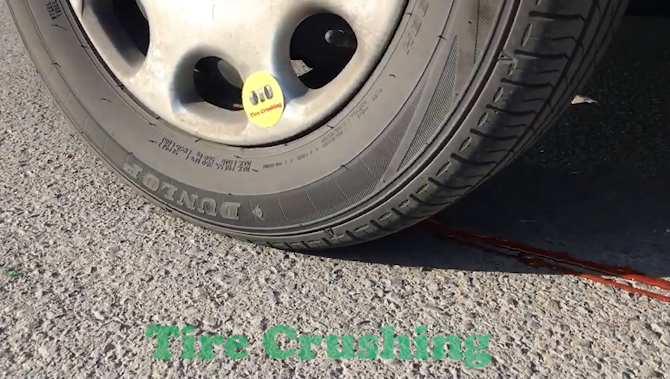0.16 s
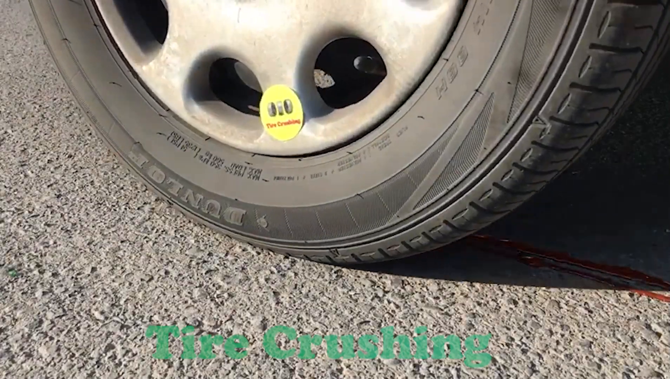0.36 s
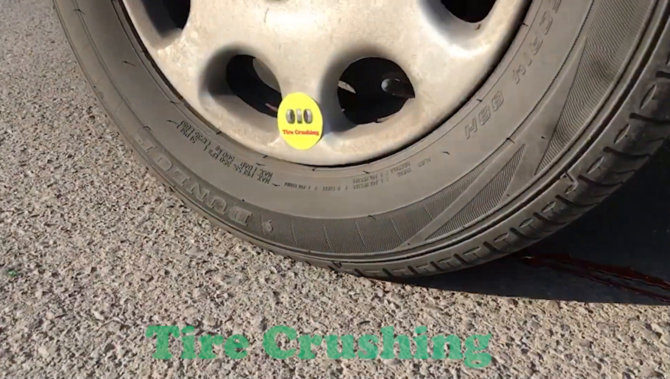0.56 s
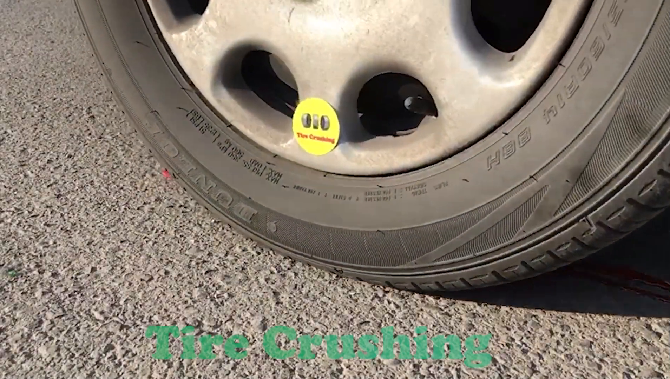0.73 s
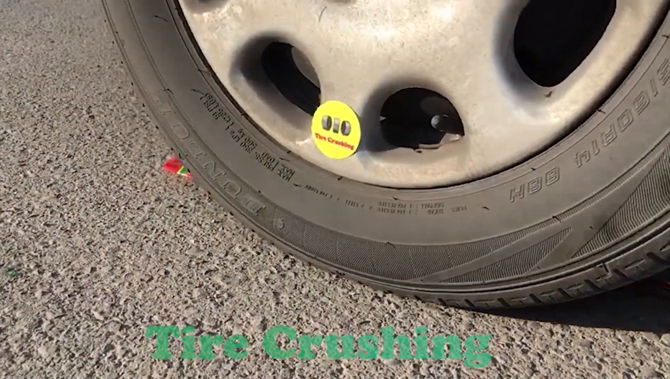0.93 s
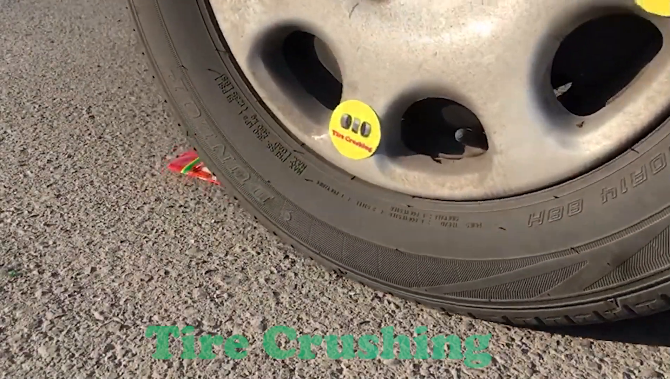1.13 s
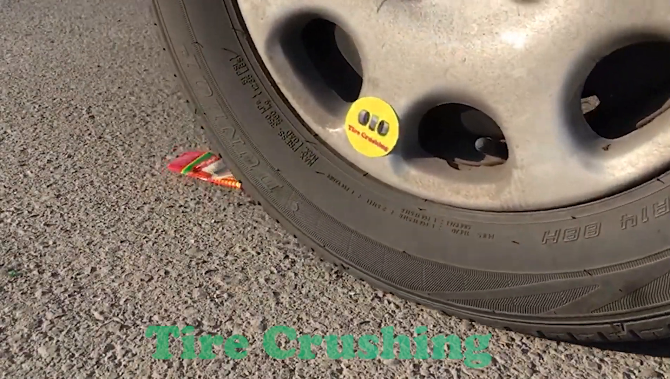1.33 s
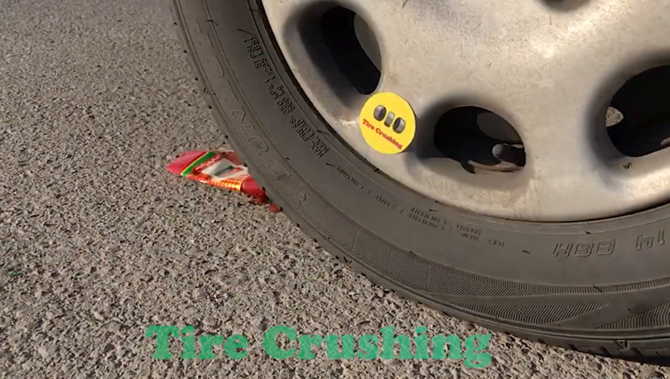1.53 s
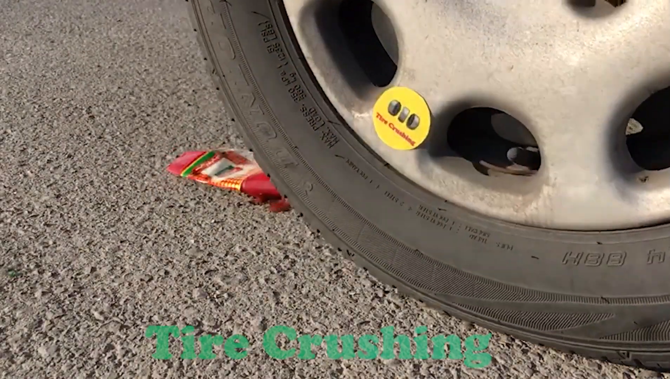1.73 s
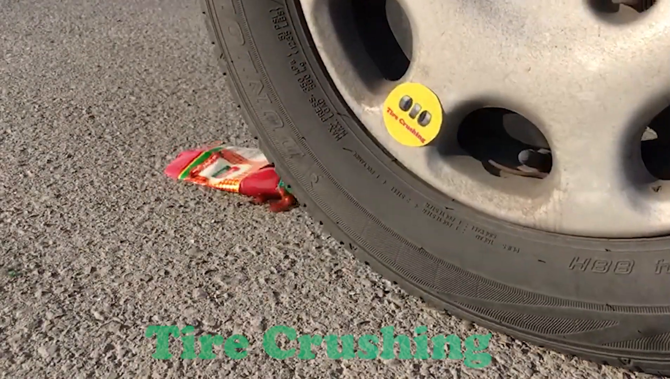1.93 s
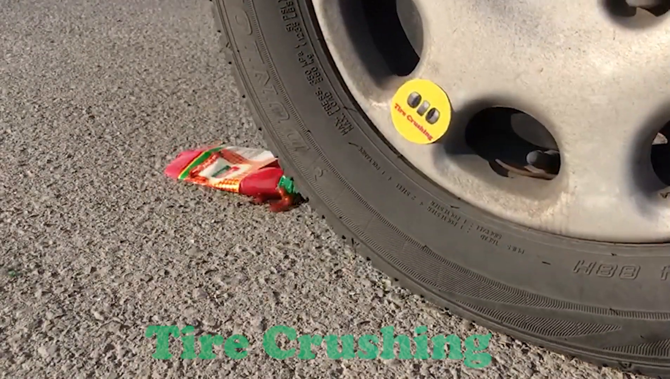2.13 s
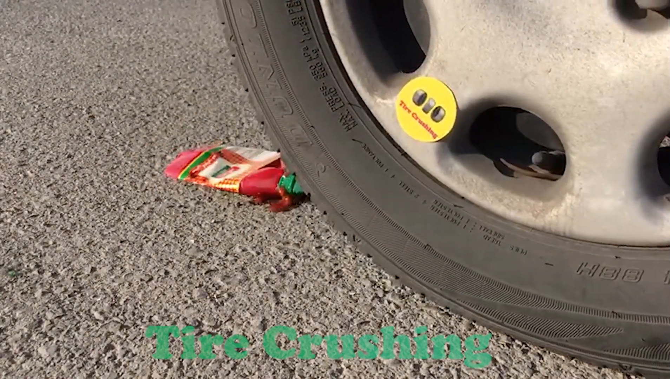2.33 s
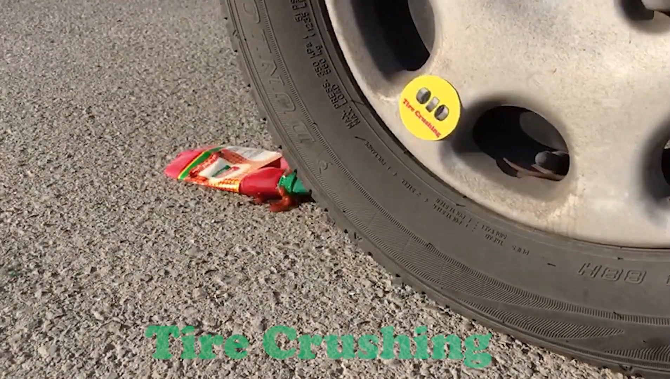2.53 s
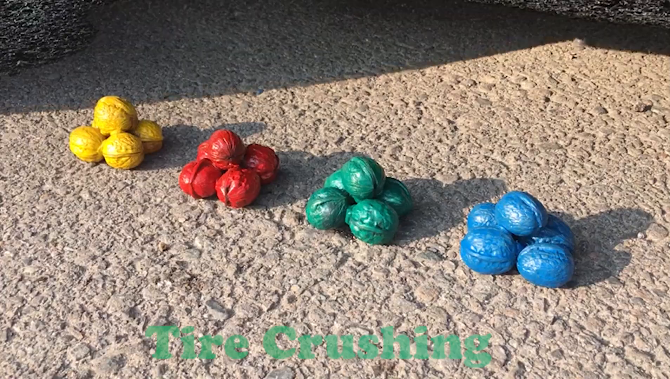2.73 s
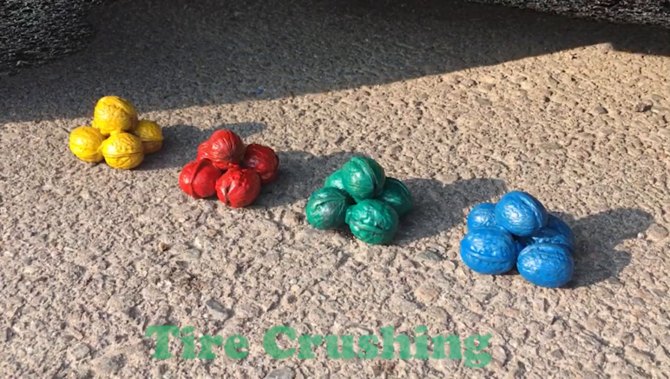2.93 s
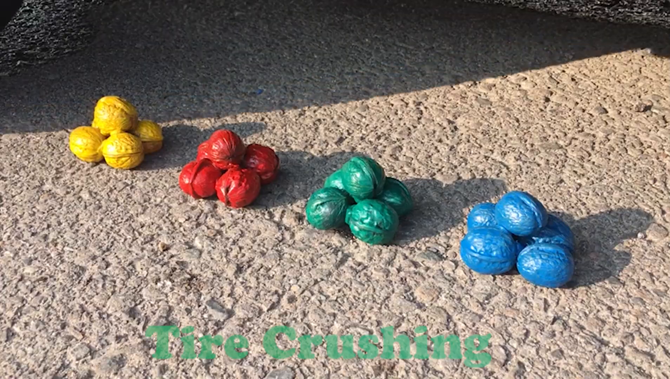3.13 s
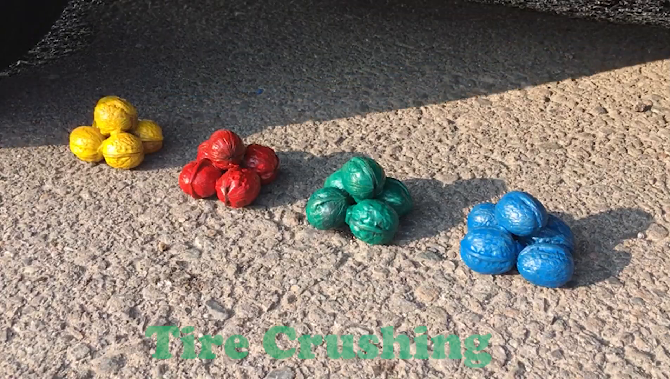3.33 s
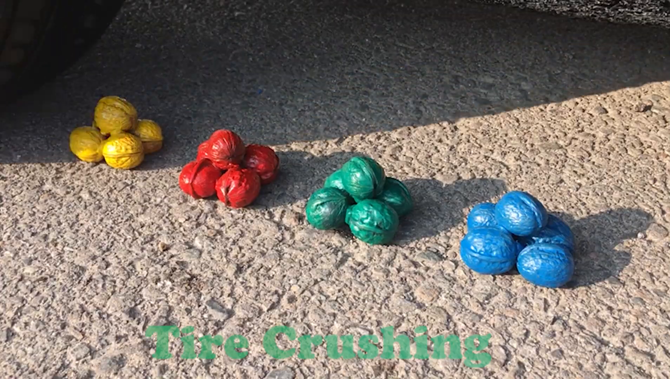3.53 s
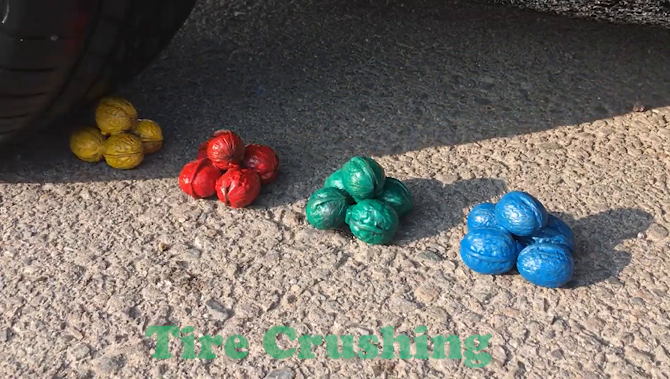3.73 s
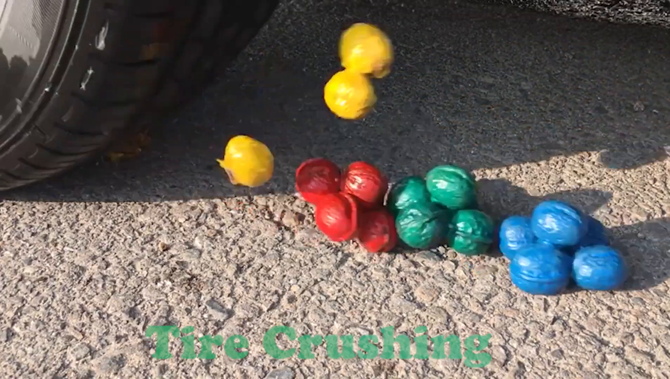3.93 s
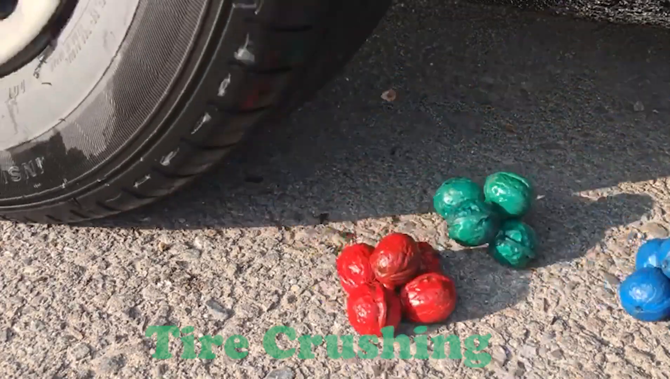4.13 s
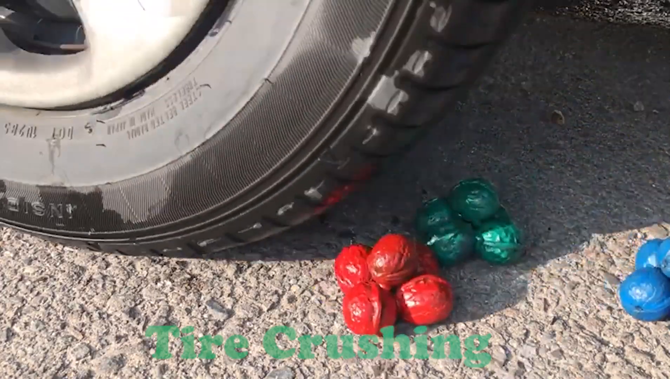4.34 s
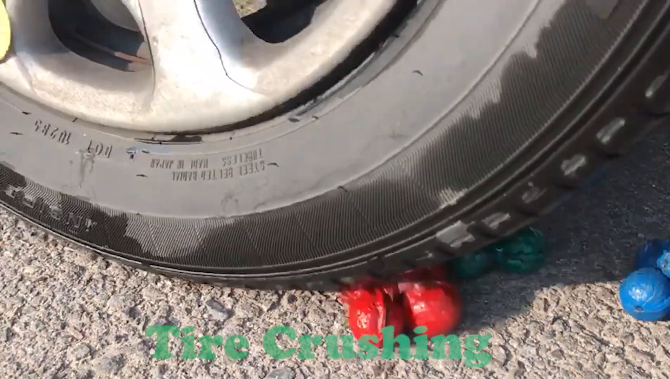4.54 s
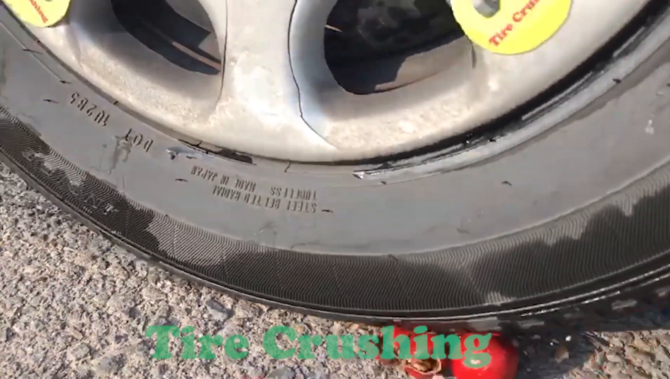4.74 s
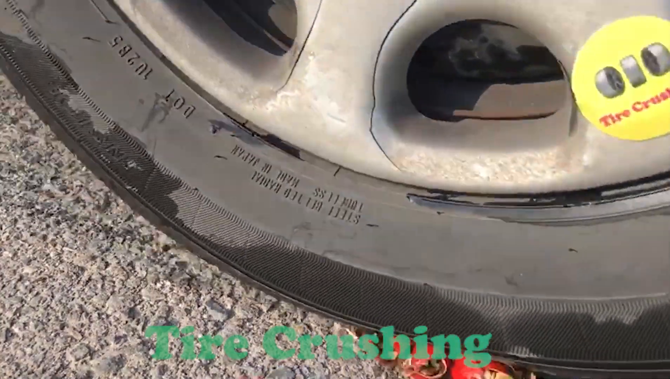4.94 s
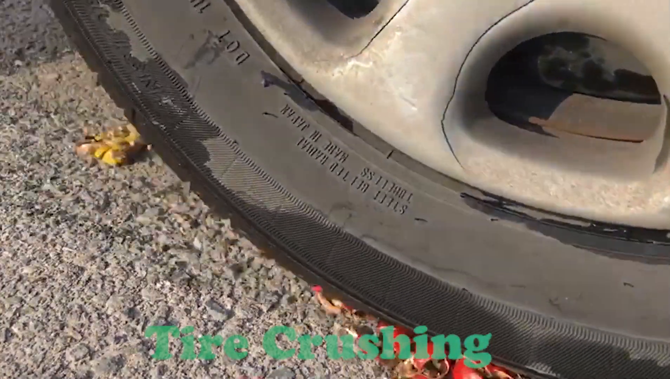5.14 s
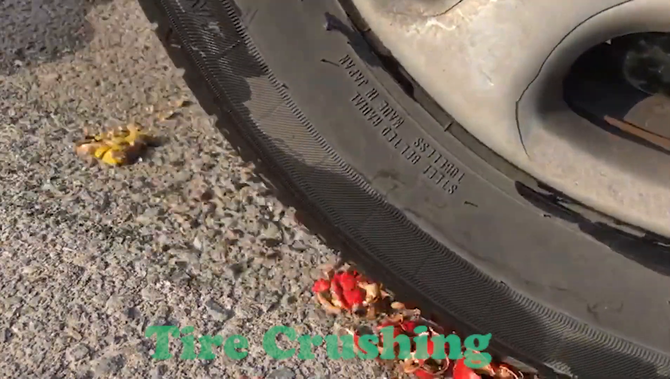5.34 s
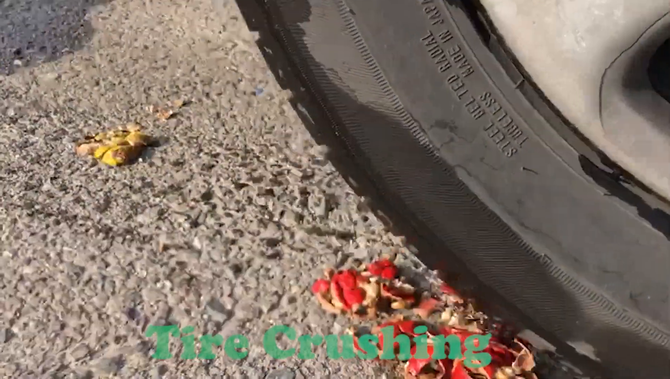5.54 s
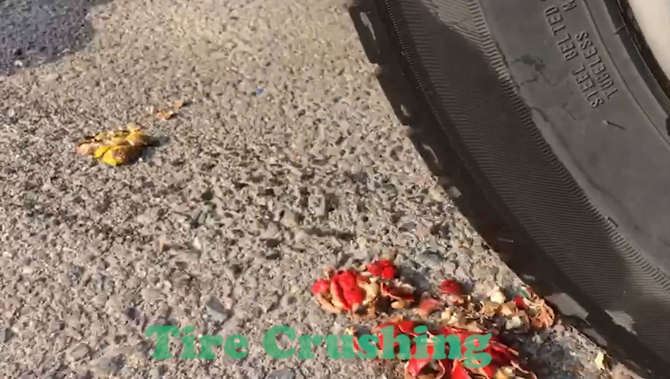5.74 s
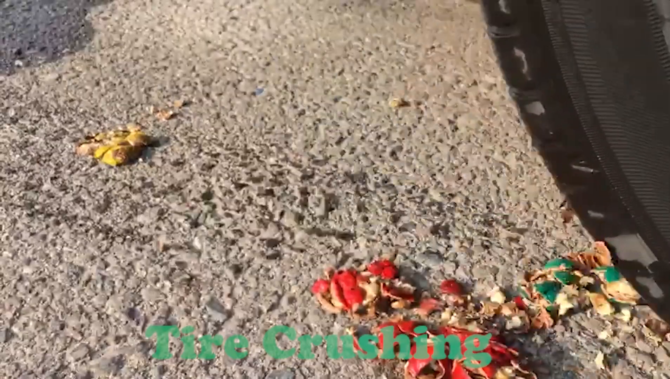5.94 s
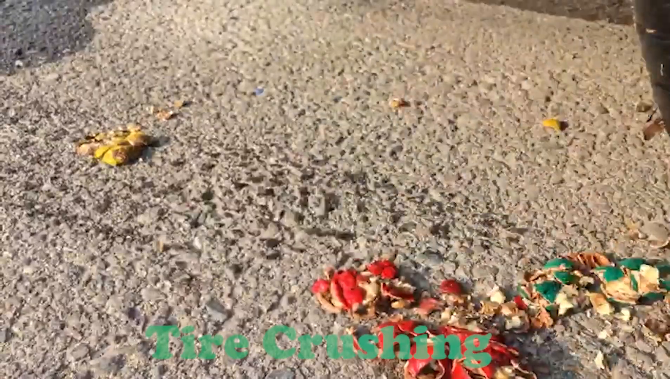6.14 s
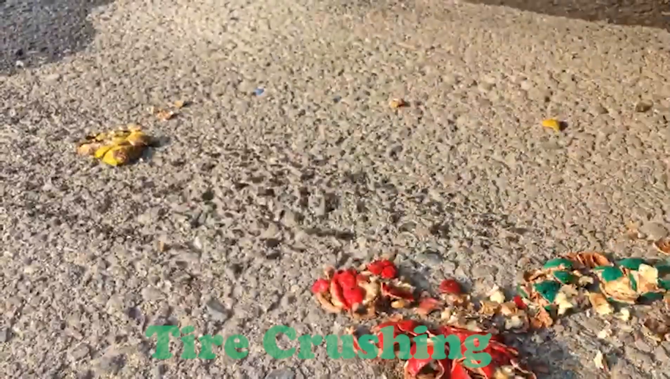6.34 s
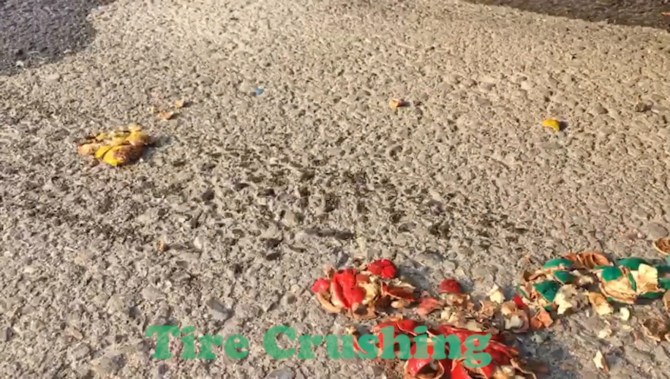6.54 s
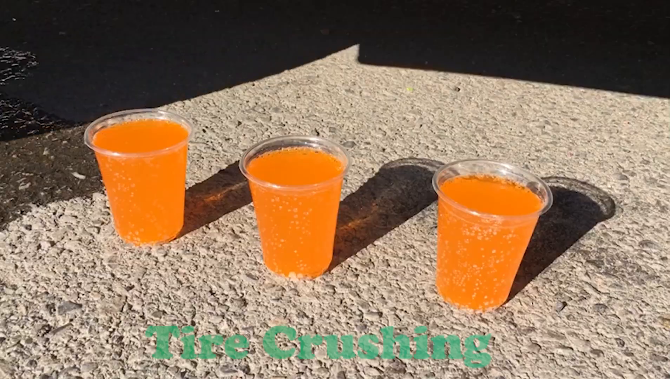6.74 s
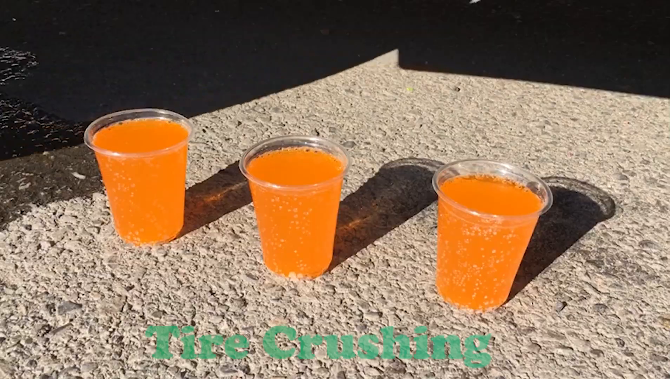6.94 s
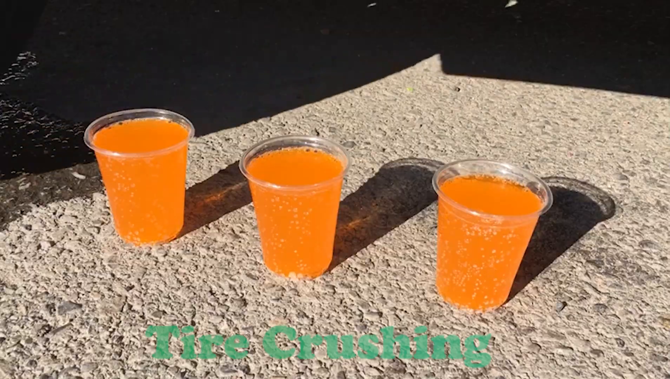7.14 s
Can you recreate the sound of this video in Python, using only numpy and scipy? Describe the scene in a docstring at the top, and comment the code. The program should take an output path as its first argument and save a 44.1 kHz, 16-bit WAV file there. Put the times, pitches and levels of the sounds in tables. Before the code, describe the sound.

Outdoor close microphone, dry, slightly overloaded by the loudest cracks. First light foil and grit snapping under slow rubber, with brief sauce squirts and strong pops; then about a second and a half of near quiet over low traffic rumble. Walnut shells burst rapidly, echoing shortly in the wheel gap, with carcass thuds and crumbs ticking. A rough scuff ends it, then a tiny dropout and fainter traffic.

```python
"""On asphalt, close to a car wheel: the tyre squashes a sachet, then crushes heaps of walnuts.
Foil, grit and shells fracture in noise bursts coloured by the breaking piece, which echo in the wheel gap.
Shell blows thump the carcass modes, and the tyre's air cavity and the rim ring on as decaying sines.
Crumbs and a scuff are filtered showers of grains; far traffic is shaped noise under a faint hiss.
At about 6.75 s the sound drops out for a moment and the traffic falls in level."""
import sys
import numpy as np
from scipy import signal
from scipy.fft import rfft, irfft, next_fast_len
from scipy.io import wavfile
from scipy.ndimage import uniform_filter1d, map_coordinates

SR = 44100
rng = np.random.default_rng(int(sys.argv[2]) if len(sys.argv) > 2 else 0)


def bounce(signal):
    """Save signal as a 16-bit WAV file at the path given by the first command-line argument."""
    frames = np.transpose(np.atleast_2d(signal))
    limited = np.clip(frames, -1, 1)
    pcm = np.round(limited * 32767).astype(np.int16)
    wavfile.write(sys.argv[1], SR, pcm)


N = 316638  # samples


def amp(db):
    """Level: decibels to an amplitude ratio."""
    return 10 ** (np.asarray(db) / 20)


def unit(x):
    """Normalisation: scales a signal to rms 1."""
    return x / np.sqrt(np.mean(x ** 2) + 1e-20)


def clock():
    """Time base: the time of every sample in seconds."""
    return np.arange(N) / SR


def wobble(rate):
    """Slow modulation: a smooth random curve with rate knots a second."""
    knots = rng.standard_normal(int(N * rate / SR) + 4)
    return map_coordinates(knots, [np.arange(N) * rate / SR])


def filtered(x, response):
    """Linear filtering: the spectrum of x times a response of frequency."""
    m = next_fast_len(N + SR // 2)
    return irfft(rfft(x, m) * response(np.fft.rfftfreq(m, 1 / SR)), m)[:N]


def spectrum(points):
    """Spectral shaping: a gain interpolated in dB through (f/Hz, level/dB) on a log frequency axis."""
    f, db = np.transpose(points)
    return lambda hz: amp(np.interp(np.log(hz + 1), np.log(f + 1), db))


def band(x, edges):
    """Band limitation: a causal band-pass."""
    return signal.sosfilt(signal.butter(3, edges, "bandpass", fs=SR, output="sos"), x)


def modes(table):
    """Modal superposition: causal resonances (f/Hz, width/Hz, level/dB) summed with alternating sign."""
    def response(f):
        total = 0
        for k, (centre, width, db) in enumerate(table):
            resonance = 1j * f * width / (centre ** 2 - f * f + 1j * f * width)
            total = total + (-1) ** k * amp(db) * resonance
        return total
    return response


def lingering(times, levels_db, t60):
    """Energy decay: the energies of successive blows add up and die away; returns the gain left."""
    energy = np.bincount(np.round(times * SR).astype(int), amp(2 * levels_db), N)
    return np.sqrt(signal.lfilter([1], [1, -amp(-120 / t60 / SR)], energy))


SWELL_DB = 25  # level change over one rise or fall time


def swell(s, rise, hold, fall, *levels):
    """Exponential growth and decay: gains that rise to time s, hold and fall again."""
    t = clock() - s
    shape_db = -SWELL_DB * np.maximum(np.maximum(-t / rise, (t - hold) / fall), 0)
    return amp(shape_db + np.array(levels)[:, None])


def grains(rate, spread_db, t60, bed_db):
    """Shot noise: tiny fractures of unequal size, rate a second, on a bed of unresolved ones."""
    sizes_db = spread_db * np.minimum(rng.exponential(size=N), 3)
    hits = (rng.random(N) < rate / SR) * amp(sizes_db)
    decay = amp(-60 * np.arange(SR // 20) / SR / t60)
    envelope = signal.fftconvolve(hits, decay)[:N]
    return (unit(envelope) + amp(bed_db)) * rng.standard_normal(N)


def ground(gains, grit, coarse_hz, fine_hz):
    """Two-band granular noise: a coarse crunch and a fine fizz, each with its own gain."""
    coarse = unit(band(grit, coarse_hz))
    fine = unit(band(grit, fine_hz))
    return gains[0] * coarse + gains[1] * fine


# Spectrum of the microphone's self-noise: f/Hz, relative spectral level/dB
HISS_SPECTRUM = [(1500, -41), (3000, -5.5), (6000, 1.5), (10000, -7.5)]


def microphone_hiss():
    """Stationary self-noise: white noise shaped by a spectrum, at a constant level."""
    hiss = filtered(rng.standard_normal(N), spectrum(HISS_SPECTRUM))
    return amp(-73.5) * unit(hiss)


# Traffic: t/s, mean rumble level/dB, mean tyre roar level/dB
TRAFFIC_LEVELS = [(0, -50.5, -54), (1.2, -50.5, -55.5), (2.2, -49, -58), (2.6, -50, -57), (3.1, -51, -57),
                  (3.7, -49.5, -55.5), (6.3, -48, -54.5), (6.5, -47.5, -49.5), (6.74, -49.5, -52),
                  (6.77, -51, -62.5), (7.18, -55.5, -60.5)]
# Spectrum of the rumble: f/Hz, relative spectral level/dB
RUMBLE_SPECTRUM = [(15, -37.5), (25, -19), (61, -0.5), (145, -9.5), (292, -20.5), (327, -19), (500, -37.5),
                   (650, -56), (1100, -120)]
# Spectrum of the tyre roar: f/Hz, relative spectral level/dB
ROAR_SPECTRUM = [(210, -18), (350, -8.5), (620, -4.5), (1000, 1), (1500, -2.5), (2200, -11.5),
                 (3110, -16.5), (5740, -30.5), (11400, -37), (12500, -52), (16200, -77), (22000, -120)]


def traffic():
    """Broadband noise: far traffic as a lumpy rumble and a smoother roar with faint grit in it."""
    s, rumble_points, roar_points = np.transpose(TRAFFIC_LEVELS)
    rumble_db = np.interp(clock(), s, rumble_points) + 0.7 * wobble(11)
    roar_db = np.interp(clock(), s, roar_points) + 0.65 * wobble(5.2)
    rumble = filtered(rng.standard_normal(N), spectrum(RUMBLE_SPECTRUM))
    grit = grains(rate=20, spread_db=3, t60=0.015, bed_db=12)
    roar = filtered(grit, spectrum(ROAR_SPECTRUM))
    return amp(rumble_db) * unit(rumble) + amp(roar_db) * unit(roar)


# A faint squeak: middle t/s, half length/s, f/Hz, mean level/dB
SQUEAK = (6.937, .022, 3200, -66)


def squeak():
    """Harmonic tone: a sine and its octave under a wavering Gaussian envelope."""
    t = clock()
    s, half, hz, db = SQUEAK
    envelope = amp(db + 3 * wobble(60)) * np.exp(-((t - s) / half) ** 2)
    octave = amp(-8.0) * np.sin(2 * np.pi * 2 * hz * t)
    return envelope * (np.sin(2 * np.pi * hz * t) + octave)


# One blow sets the rim ringing: t/s, level/dB, t60/s
RIM_BLOW = (4.05, -53, 2.4)
RIM_HZ = 346


def rim_ring():
    """Free vibration: one blow leaves the rim sounding a decaying sine."""
    t = clock()
    s, db, t60 = RIM_BLOW
    gain = (t > s) * amp(db - 60 * (t - s) / t60)
    return gain * np.sin(2 * np.pi * RIM_HZ * t)


CAVITY_HZ = 242
CAVITY_DB, CAVITY_T60, CAVITY_RISE_S = -28.5, 1.43, 0.04  # nominal level re thumps, decay, half the rise


def cavity_hum():
    """Cavity resonance: the air in the tyre stores energy from the thumps and hums on."""
    t = clock()
    s, _, _, thump_db = np.transpose(SHELL_CRACKS)
    gain = lingering(s + CAVITY_RISE_S, thump_db + CAVITY_DB, CAVITY_T60)
    gain = uniform_filter1d(gain, round(2 * CAVITY_RISE_S * SR))
    gain = gain * amp(1.6 * wobble(7))
    return gain * np.sin(2 * np.pi * CAVITY_HZ * t)


# The tread scuffs off the heap: t/s, rise/s, hold/s, fall/s, coarse level/dB, fine level/dB
SCUFFS = [(6.069, 0.02, 0.055, 0.04, -24, -30), (6.156, 0.018, 0.0077, 0.12, -32.5, -35.5)]
# Spectrum of the scuff: f/Hz, relative spectral level/dB
SCUFF_SPECTRUM = [(88, -39), (150, -5), (1280, -1), (3120, -13), (8470, -21.5), (11400, -28), (12500, -37),
                  (16200, -81), (22000, -120)]


def scuff():
    """Friction noise: the tread rubs off the heap in a dense shower of grains."""
    rub = grains(rate=320, spread_db=2, t60=0.02, bed_db=-6)
    rub = filtered(rub, spectrum(SCUFF_SPECTRUM))
    gains = sum(swell(*row) for row in SCUFFS)
    return ground(gains, rub, (150, 2000), (2000, 12000))


# Grit under the tread beside the sachet:
# from t/s, to t/s, coarse level/dB, initial fine level/dB, fine slope/(dB/s)
SACHET_GRIT = (0, 1.03, -53.5, -59.5, -10.5)


def crumble(left):
    """Granular fracture: grit, then the crumbs left by the cracks, tick under the tread."""
    start, end, coarse_db, fine_db, slope_db = SACHET_GRIT
    t = clock()
    grit = (t >= start) * (t < end) * amp([coarse_db + 0 * t, fine_db + slope_db * (t - start)])
    crumbs = grains(rate=130, spread_db=3, t60=0.01, bed_db=-11)
    return ground(grit + left, crumbs, (450, 2500), (2500, 11000))


# Bands of a crack, in order knock, snap, splinter: low f/Hz, high f/Hz
CRACK_BANDS = [(330, 1500), (1500, 4500), (4500, 12000)]
# Envelopes before filtering, per band: burst t60/s, echo t60/s, echo level/dB re burst
CRACK_DECAYS = [(0.016, 0.076, -9), (0.01, 0.076, -12.5), (0.0066, 0.048, -9.5)]
# Resonance of the breaking piece: sharpness Q, lift in the burst/dB, lift in the echo/dB
PIECE_RESONANCE = (4.5, 9, 0)
PIECE_LOW, PIECE_HIGH = 0.26, 2.5  # radiation falls off under and over these multiples of the ring
LIGHT_ECHO = 0.12  # light, bright pieces echo less: dB lost per dB of snap over knock
# Air modes between wheel and road: f/Hz, width/Hz, level/dB
GAP_MODES = [(970, 270, -8), (1500, 120, 3.5), (2300, 940, -9.5), (3100, 280, 7), (4440, 4500, -10.5),
             (6440, 940, 8)]


def cracks(times, pitch, levels_db):
    """Impulsive radiation: fracture bursts coloured by the breaking piece; echoes ring the wheel gap."""
    t = np.arange(SR // 10) / SR
    starts = np.round(times * SR).astype(int)
    at = (starts[:, None] + np.arange(len(t))).ravel()
    q, burst_lift_db, echo_lift_db = PIECE_RESONANCE
    u = np.fft.rfftfreq(len(t), 1 / SR) / pitch[:, None, None]  # frequency relative to the ring
    piece = 1 + amp([[burst_lift_db], [echo_lift_db]]) * 1j * u / (q * (1 - u * u) + 1j * u)
    piece *= 1j * u / (PIECE_LOW + 1j * u) / (1 + 1j * u / PIECE_HIGH) ** 2
    brightness_db = np.maximum(levels_db[1] - levels_db[0], 0)
    echo_share = amp(-LIGHT_ECHO * brightness_db)[:, None]
    direct, echoes = np.zeros(N), np.zeros(N)
    for edges, (burst, echo, echo_db), level_db in zip(CRACK_BANDS, CRACK_DECAYS, levels_db):
        echo_shape = amp(-60 * t / echo) * (1 - np.exp(-t / 0.0017))
        shapes = np.array([amp(-60 * t / burst), echo_shape])
        noise = rng.standard_normal((len(times), 2, len(t)))
        rows = band(shapes * noise, edges)
        rows = irfft(rfft(rows) * piece, len(t))
        rows *= amp(level_db)[:, None, None] / np.abs(rows).max(axis=2, keepdims=True)  # set the peaks
        direct += np.bincount(at, rows[:, 0].ravel(), N + SR)[:N]
        echoes += amp(echo_db) * np.bincount(at, (echo_share * rows[:, 1]).ravel(), N + SR)[:N]
    gap = modes(GAP_MODES)
    return direct + filtered(echoes, lambda f: 0.64 + gap(f))


# Spits of sauce: t/s, rise/s, hold/s, fall/s, coarse level/dB, fine level/dB
SAUCE_SPITS = [(0.73, .004, .055, .035, -41, -47), (0.95, .1, .03, .2, -44, -66),
               (1.145, .06, .02, .04, -48, -51)]


def sauce_spits():
    """Jet noise: sauce spits out as brief swells of granular hiss."""
    spit = grains(rate=300, spread_db=3.5, t60=0.009, bed_db=-4)
    gains = sum(swell(*row) for row in SAUCE_SPITS)
    return ground(gains, spit, (2200, 5500), (5500, 10500))


SCATTER_DB = 3  # chance spread of every splinter, standard deviation
# Foil and grit snaps: t/s, ring f/Hz, knock peak level/dB, snap level/dB re knock
FOIL_SNAPS = [(0.006, 1310, -37.5, 4), (0.059, 3400, -52.5, 18), (0.0949, 970, -16, -18),
              (0.1075, 2300, -24, -0.5), (0.142, 1780, -32, 5.5), (0.186, 2000, -26, -1),
              (0.214, 3250, -38, 9), (0.2464, 1120, -40, 9), (0.338, 1820, -26, 1.5),
              (0.3775, 1570, -29, -5), (0.4277, 1370, -30, 2.5), (0.444, 930, -15, -3),
              (0.459, 1370, -37.5, 15), (0.524, 1460, -32, -8), (0.6291, 6900, -40, 5),
              (0.6907, 5340, -28.5, 0.5), (0.727, 2830, -35, 13), (0.735, 1610, -28.5, 6),
              (0.7577, 1570, -18, 2), (0.961, 4100, -34, 13.5), (1.0203, 2100, -33, 0),
              (1.0958, 1040, -30.5, -10), (1.1537, 1470, -27.5, 3), (1.2419, 690, -15, -58),
              (1.3033, 970, -7.5, -0.5), (1.3961, 1630, -19, -20), (1.4379, 1500, -16, 15),
              (1.7378, 1290, -8.5, -15.5), (1.8723, 800, -18, -28), (1.944, 1620, -32.5, -9.5),
              (1.961, 1590, -43, 2), (2.718, 5230, -65.5, 16), (3.2016, 970, -44, 1),
              (3.249, 5700, -57, 15), (3.477, 1460, -53.5, 12), (3.6339, 980, -35.5, -11),
              (3.7269, 530, -40.5, -2), (6.3033, 1040, -37, -25), (6.4853, 1480, -44, 10.5),
              (6.5572, 3846, -42, 10), (6.895, 3685, -60.5, 19.5)]
# Stretches of small grit ticks: from t/s, to t/s, mean knock peak level/dB
GRIT_TICKS = [(0, 1.203, -36.5), (6.301, 6.602, -48.5)]
TICKS_PER_S, TICK_HZ, TICK_SPREAD_DB = 12, 1600, 5  # ring within an octave of TICK_HZ
FOIL_SPLINTER_DB, FOIL_GROWS = -16.5, 0.83  # mean splinter level at a 0 dB snap, dB per dB of snap


def sachet():
    """Brittle fracture: light snaps that do not shake the tyre, with small ticks and spits among them."""
    rows = [np.array(FOIL_SNAPS)]
    for start, end, db in GRIT_TICKS:
        count = round((end - start) * TICKS_PER_S)
        place, octave, loud, bright = rng.random((count, 4)).T * 2 - 1
        tick_s = start + (end - start) * (place + 1) / 2
        tick_db = db + TICK_SPREAD_DB * loud
        rows.append(np.c_[tick_s, TICK_HZ * 2 ** octave, tick_db, 2 * TICK_SPREAD_DB * bright])
    s, pitch, knock_db, bright_db = np.vstack(rows).T
    snap_db = knock_db + bright_db
    splinter_db = FOIL_GROWS * snap_db + FOIL_SPLINTER_DB
    splinter_db = splinter_db + SCATTER_DB * rng.standard_normal(len(s))
    return cracks(s, pitch, [knock_db, snap_db, splinter_db]) + sauce_spits()


# Carcass modes of the tyre: f/Hz, width/Hz, relative level/dB
CARCASS_MODES = [(46.6, 3.7, -0.5), (77.3, 16, 2.5), (103, 15, 6.5), (185, 76, 3.5), (360, 70, 3.5)]


def carcass_thumps(s, thump_db):
    """Modal impulse response: each blow, 1 ms after its crack, excites the tyre carcass."""
    thump = filtered(np.arange(N) == 0, modes(CARCASS_MODES))[:SR // 2]
    blows = np.bincount(np.round((s + 0.001) * SR).astype(int), amp(thump_db), N)
    return signal.fftconvolve(blows, thump / np.abs(thump).max())[:N]


# Shell cracks: t/s, ring f/Hz, snap peak level/dB, thump peak level/dB
SHELL_CRACKS = [(3.8462, 1370, -24.5, -37.5), (3.868, 727, -29, -24), (3.898, 590, -20, -27.5),
                (3.9205, 3030, -19, -32), (3.9249, 3090, -1, -8.5), (3.9318, 2985, -1, -14.5),
                (3.9538, 4500, -14, -24), (3.9628, 2300, -16.5, -25), (3.9861, 2600, -11, -45.5),
                (4.0039, 3020, -20.5, -23.5), (4.02, 734, -3, -10), (4.0245, 446, -14.5, -3),
                (4.0427, 1520, -11, -14), (4.0851, 1570, -16.5, -16.5), (4.1056, 1540, -11, -24.5),
                (4.1477, 1028, -4.5, -13.5), (4.2435, 1600, -3.5, -35), (4.274, 2370, -15.5, -44),
                (4.3455, 1840, -23.5, -47), (4.38, 3940, -8, -43), (4.4222, 6240, -19.5, -39.5),
                (4.4555, 3480, -11, -49), (4.4897, 4120, -15, -52), (4.51, 1970, -20.5, -39),
                (4.564, 3510, -12, -47.5), (4.58, 3280, -8.5, -51), (4.589, 1023, -9, -19.5),
                (4.5928, 1010, -7.5, -26), (4.6008, 7100, -6, -39), (4.6164, 3550, -9.5, -27.5),
                (4.624, 3000, -5, -27), (4.628, 3020, 1.5, -9.5), (4.6369, 3635, -6.5, -23.5),
                (4.6529, 980, -22.5, -18.5), (4.6807, 864, -7.5, -22.5), (4.6924, 1120, -14, -24.5),
                (4.7095, 895, -6.5, -27.5), (4.7206, 1176, -12, -24), (4.7659, 1650, -13, -33.5),
                (4.7731, 4180, -12, -34), (4.7914, 1063, -3, -25.5), (4.7965, 7000, -4.5, -30),
                (4.7988, 1917, -5, -19.5), (4.8074, 3940, -8.5, -27), (4.8145, 6000, -10, -37),
                (4.8238, 5760, 2, -32), (4.8316, 745, -5.5, -11.5), (4.8413, 3750, -4.5, -37),
                (4.8495, 920, -8.5, -23), (4.8856, 3480, -20, -33), (4.916, 911, -3, -4.5),
                (4.9305, 1230, -10.5, -6), (4.9797, 970, -1, -14), (5.0048, 914, 1, -7),
                (5.0232, 1326, -21.5, -13.5), (5.075, 2140, -14, -39.5), (5.0938, 1343, -2, -15),
                (5.1, 5790, -17, -20), (5.1232, 2546, -1, -15.5), (5.1513, 983, -9, -26.5),
                (5.1813, 1913, -15.5, -14.5), (5.194, 3100, -1.5, -6), (5.2034, 5960, -11, -25),
                (5.3148, 1173, -4.5, -7), (5.3797, 2344, -10.5, -23.5), (5.4025, 3075, -1, -14),
                (5.416, 1340, -7.5, -22.5), (5.4407, 3350, -1, -10.5), (5.474, 1220, -16.5, -27.5),
                (5.5147, 885, -6.5, -22), (5.5459, 5640, -18, -38.5), (5.5704, 3620, -19, -41),
                (5.609, 2500, -27.5, -38.5), (5.6183, 970, -1, -9), (5.6502, 763, -8, -9.5),
                (5.7515, 1190, -9, -26), (5.7742, 1000, -20.5, -27), (5.8112, 1030, -12.5, -15),
                (5.8518, 6460, -33.5, -33), (5.8638, 2300, -16, -43), (5.8838, 1170, -26, -43),
                (5.9308, 1120, -32.5, -55), (5.9672, 1140, -26, -46)]
KNOCK_SHARE, KNOCK_DB = 0.45, 2.5  # the knock lies between snap and thump: share of the thump, lift
SHELL_SPLINTER_DB, SHELL_GROWS = -1.5, 1.204  # mean splinter level at a 0 dB snap, dB per dB of snap
SHARD_S, SHARD_DB, SHARD_SPREAD_DB = 0.0075, -15.5, 1.5  # median delay, mean level re crack, spread
# Crumbs after a crack: coarse level/dB re knock, fine level/dB re snap
CRUMB_LEVELS = (-32.5, -38.5)
CRUMB_T60 = 0.6  # s


def nuts():
    """Fracture and impact: shells crack and shed shards, the tread drops on them, crumbs tick on."""
    s, pitch, snap_db, thump_db = np.transpose(SHELL_CRACKS)
    knock_db = KNOCK_SHARE * thump_db + (1 - KNOCK_SHARE) * snap_db + KNOCK_DB
    scatter, delay, detune, loud = rng.standard_normal((len(s), 4)).T
    splinter_db = SHELL_GROWS * snap_db + SHELL_SPLINTER_DB + SCATTER_DB * scatter
    levels_db = np.array([knock_db, snap_db, splinter_db])
    shard_s = s + SHARD_S * np.exp(0.65 * delay)
    shard_levels_db = levels_db + SHARD_DB + SHARD_SPREAD_DB * loud
    shards = cracks(shard_s, pitch * np.exp(0.31 * detune), shard_levels_db)
    left = [amp(db) * lingering(s, level_db, CRUMB_T60)
            for db, level_db in zip(CRUMB_LEVELS, levels_db)]
    shells = cracks(s, pitch, levels_db)
    return shells + shards + carcass_thumps(s, thump_db) + crumble(np.array(left))


def scene():
    """Superposition: all sources add linearly, from the background to the walnuts."""
    background = microphone_hiss() + traffic()
    tones = squeak() + rim_ring() + cavity_hum()
    return (background + tones + scuff() + sachet() + nuts())[None]


# Microphone response: f/Hz, level/dB
MIC_RESPONSE = [(20, 3.5), (10500, -3.5), (11800, -6), (12800, -43)]
CEILING = 0.91  # amplitude at which the input saturates
# Momentary dropout: from t/s, to t/s
MUTE_SPAN = (6.745, 6.762)
TOP_HZ = 12930


def record(dry):
    """Saturation and band limitation: loud cracks overload the input; the sound briefly cuts out."""
    t = clock()
    heard = filtered(dry[0], spectrum(MIC_RESPONSE))
    held = heard / (1 + np.abs(heard / CEILING) ** 6) ** (1 / 6)
    start, end = MUTE_SPAN
    mute = uniform_filter1d(1. - (t > start) * (t < end), size=100)  # softened edges
    return filtered(held * mute, lambda hz: hz < TOP_HZ)[None]


dry = scene()
out = record(dry)
bounce(out)
```